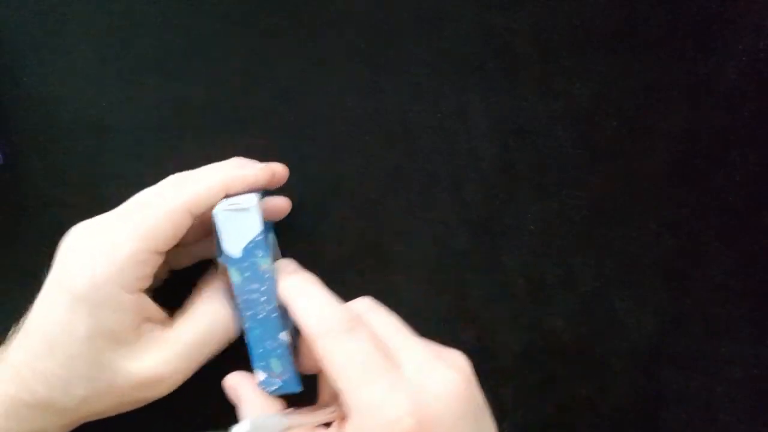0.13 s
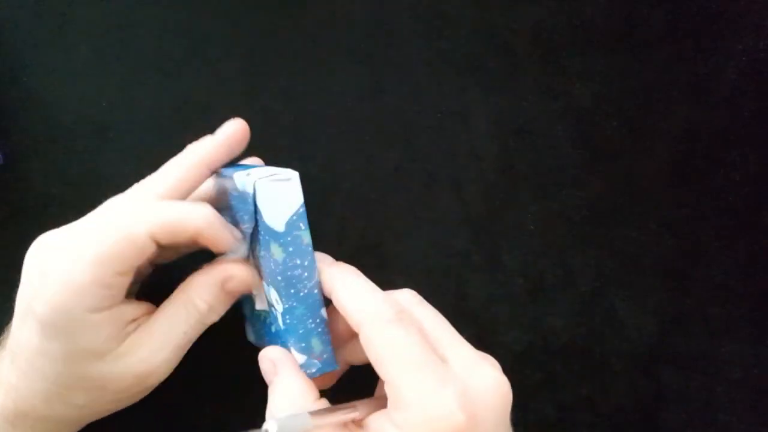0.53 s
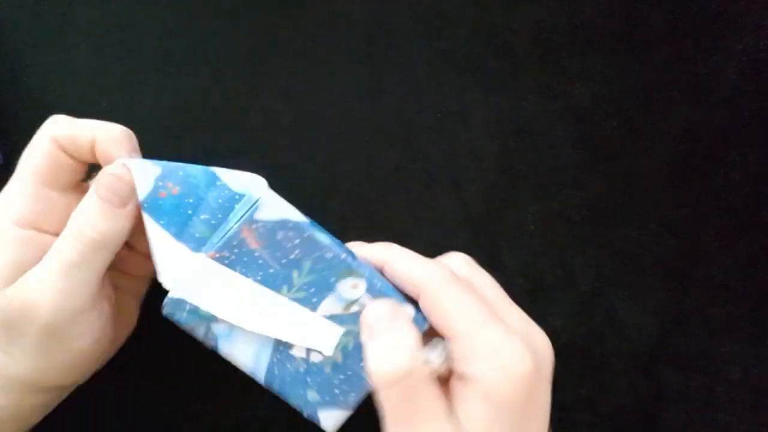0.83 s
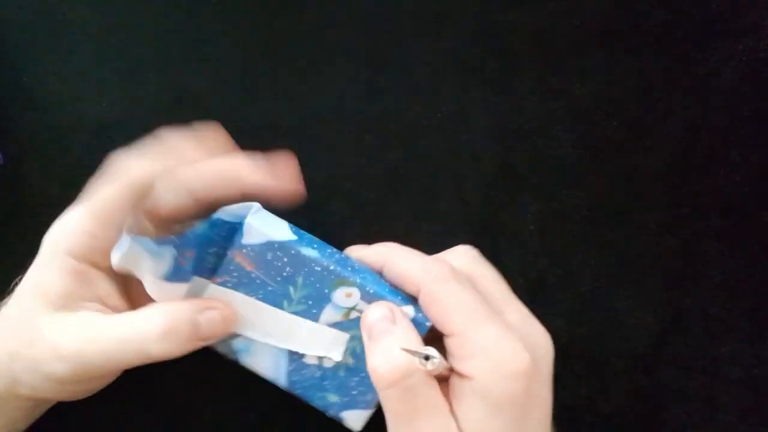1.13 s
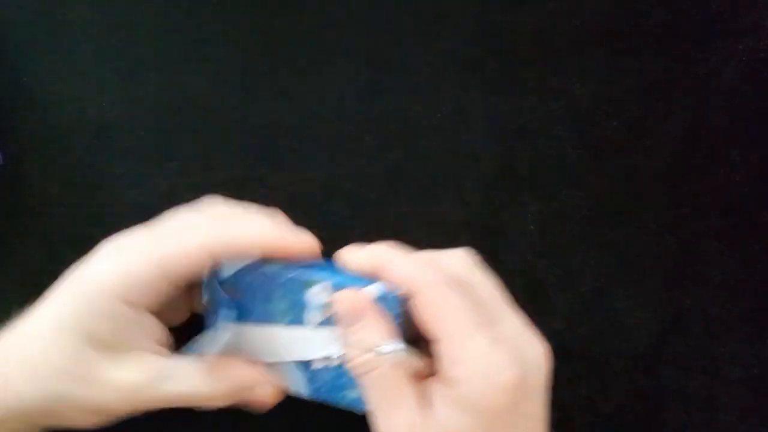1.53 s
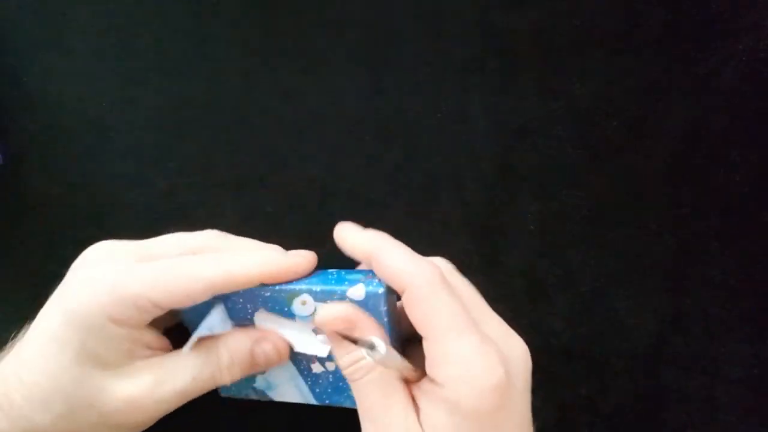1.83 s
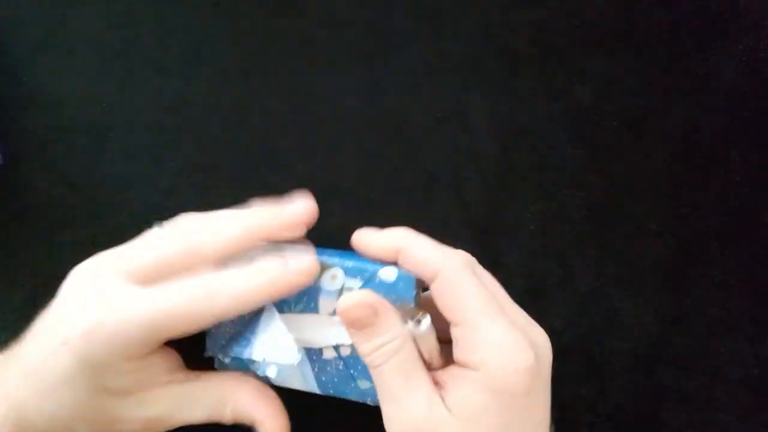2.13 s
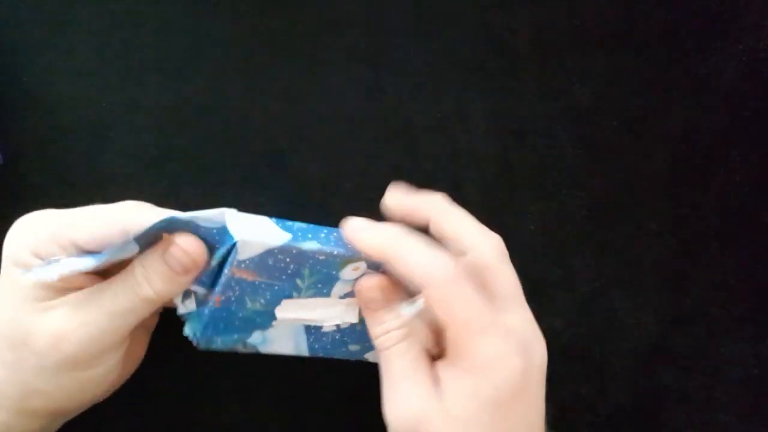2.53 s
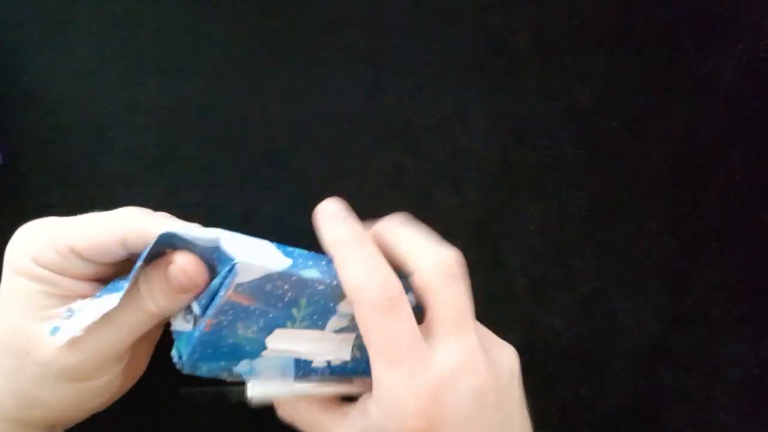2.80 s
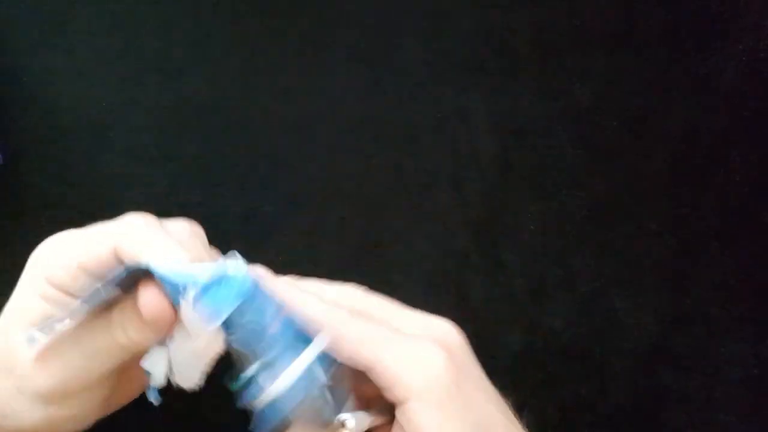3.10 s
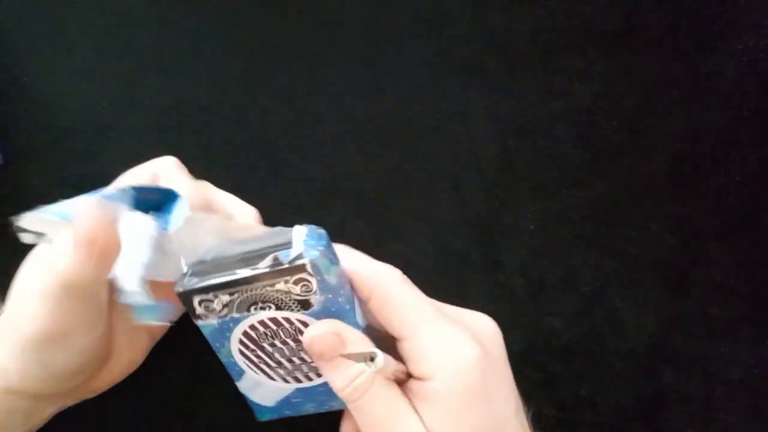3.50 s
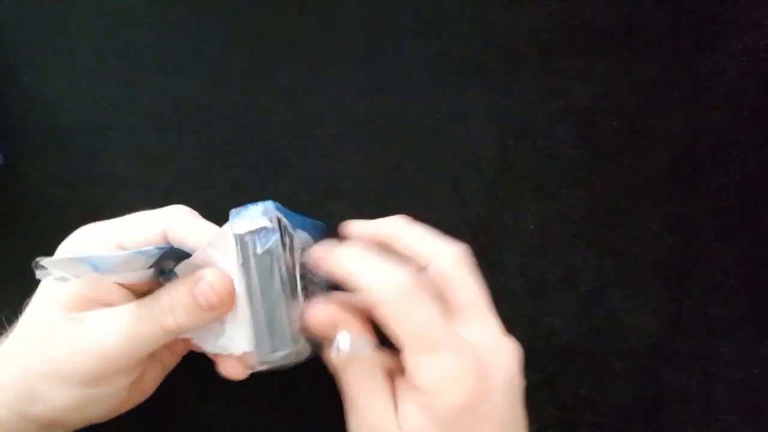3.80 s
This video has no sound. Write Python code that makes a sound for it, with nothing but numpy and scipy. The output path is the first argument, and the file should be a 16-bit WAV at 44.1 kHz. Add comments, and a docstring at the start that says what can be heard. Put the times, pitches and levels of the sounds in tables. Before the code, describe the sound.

Stiff gift paper crinkles and tears off a small cardboard box, close, in a small, fairly dry room. Light crackles at 0.1-0.25 s, near quiet, then a sharp rip at 0.7-0.9 s. Soft rustles follow around 1.4 s, a snap at 1.8, busier crinkling and hollow pops from 2.4. Loudest tearing runs 2.9-3.45 with faint box thumps; after a lull, crisp crumples from 3.7 to the end. Faint hiss throughout.

```python
"""Unwrapping a small box.

Hands pull stiff gift paper off a small cardboard box, close to and a little left of a spaced stereo microphone.
Creases buckle as cracks with short rings; tearing and crumpling are swarms of tiny noise bursts, with a duller rustle.
Hollow pops and low thumps are short decaying sines. A small furnished room answers over faint hiss and rumble."""
import sys
import numpy as np
from scipy import signal
from scipy.fft import rfft, irfft
from scipy.io import wavfile

SR = 44100
rng = np.random.default_rng(int(sys.argv[2]) if len(sys.argv) > 2 else 0)


def waveform_to_disk(signal):
    """Save audio, clipped to [-1, 1], as 16-bit WAV at the path in sys.argv[1]."""
    frames = np.transpose(np.atleast_2d(signal))
    scaled = np.clip(frames, -1, 1) * 32767
    samples = np.round(scaled).astype(np.int16)
    wavfile.write(sys.argv[1], SR, samples)


N = 174195

# colour of the box, for knocks and rustle: (frequency [Hz], density [dB per Hz])
BOX_SPECTRUM = [(35, -49.5), (60, -3.5), (180, -27.5), (249, -14.5), (556, -8), (823, -3.5), (1150, -1.5),
                (1600, -7.5), (2130, -2.5), (3000, -4), (3900, -51.5), (6600, -120)]

PAPER_ALIKE, BOX_ALIKE = 0.5, 0.9   # energy share of a burst common to both microphones
RIGHT_LAG_SAMPLES = 10
BURST_SAMPLES = 512


def amp(db):
    """Amplitude ratio of a level in dB."""
    return 10 ** (np.asarray(db) / 20)


def rms_one(x):
    """Scale to RMS 1."""
    return x / np.sqrt(np.mean(x ** 2) + 1e-20)


def at_hz(points, hz):
    """Table value at a frequency, interpolated over log frequency."""
    table_hz, values = np.transpose(points)
    return np.interp(np.log(hz + 1), np.log(table_hz), values)


def convolve(x, kernel):
    """Convolve along time, cut to the scene length."""
    return signal.fftconvolve(np.atleast_2d(x), np.atleast_2d(kernel), axes=1)[:, :N]


def colour(spectrum, size=4096):
    """Causal (minimum-phase) filter of a dB spectrum, energy 1."""
    hz = np.fft.rfftfreq(size, 1 / SR)
    cepstrum = irfft(np.log(amp(at_hz(spectrum, hz))))
    cepstrum[1:size // 2] *= 2   # fold the cepstrum: minimum phase
    cepstrum[size // 2 + 1:] = 0
    return rms_one(irfft(np.exp(rfft(cepstrum)))) / np.sqrt(size)


def drift(rate_hz):
    """Slow random drift: noise through two equal one-pole lowpasses, RMS 1."""
    pole = np.exp(-2 * np.pi * rate_hz / SR)
    white = rng.standard_normal(N + SR)
    return rms_one(signal.lfilter([1], [1, -2 * pole, pole * pole], white)[SR:])


def stereo_noise(alike_hz, *shape):
    """White noise (.., 2, samples), shared by both sides in the bass only."""
    white = rng.standard_normal(shape)
    low = signal.sosfilt(signal.butter(1, alike_hz, fs=SR, output="sos"), white)
    return white - low + low[..., :1, :]


def bursts(decay_s, alike, count):
    """Dying noise bursts (count, 2, samples), partly shared by the sides, partly whitened, energy 1."""
    t = np.arange(BURST_SAMPLES) / SR
    common = rng.standard_normal((count, 1, BURST_SAMPLES))
    own = rng.standard_normal((count, 2, BURST_SAMPLES))
    noise = np.sqrt(alike) * common + np.sqrt(1 - alike) * own
    spectrum = rfft(noise * np.exp(-t / decay_s))
    out = irfft(spectrum / np.sqrt(np.abs(spectrum))) * np.exp(-0.5 * t / decay_s)
    return out / np.sqrt(np.sum(out ** 2, axis=2, keepdims=True))


def swarm(per_s, spread_db, decay_s, alike, spectrum, low_hz, high_hz):
    """Random clumped bursts of very uneven size, dealt to folds, each with its own ring and busy spells."""
    folds, ring_share, ring_q = 12, 1.1, 3.5
    clump_db, clump_hz = 2.8, 120   # all folds together
    patch_db, patch_hz = 2.4, 20    # each fold alone
    sizes = amp(spread_db * np.minimum(rng.exponential(1, N), 5))
    struck = rng.random(N) < per_s / SR
    clicks = sizes * struck * amp(clump_db * drift(clump_hz))
    fold_of = rng.integers(0, folds, N)
    shapes = bursts(decay_s, alike, count=folds)
    out = np.zeros((2, N))
    for k, hz in enumerate(np.geomspace(low_hz, high_hz, folds)):
        ringing = signal.lfilter(*signal.iirpeak(hz, ring_q, fs=SR), shapes[k])
        shape = shapes[k] + ring_share * ringing / np.sqrt(np.sum(ringing ** 2) / 2)
        fold_clicks = clicks * (fold_of == k) * amp(patch_db * drift(patch_hz))
        out += convolve(fold_clicks, shape)
    return convolve(out, colour(spectrum))


def add(out, time_s, sound):
    """Mix a sound in at a time."""
    i = int(time_s * SR)
    out[:, i:i + sound.shape[1]] += sound


def rings(rows, cycles):
    """Soft pushes: sines with a rounded attack, falling 60 dB in the given cycles."""
    attack_cycles = 0.8
    out, t = np.zeros((2, N + SR)), np.arange(SR // 4) / SR
    for time_s, level_db, hz in rows:
        attack = 1 - np.exp(-t * hz / attack_cycles)
        decay = np.exp(-np.log(1000) * hz * t / cycles)
        add(out, time_s, amp(level_db) * (np.sin(2 * np.pi * hz * t) * attack * decay)[None])
    return out[:, :N]


def noise_floor():
    """Steady hiss and rumble: coloured noise, alike on both sides in the deep bass."""
    # (frequency [Hz], density [dB per Hz])
    floor_spectrum = [(15, -29.5), (25, -11), (76, 5.5), (368, -10), (433, -10.5), (1090, -14), (2460, -21),
                      (6920, -12), (8370, -22), (15200, -11), (16500, -30.5)]
    level_db, alike_hz = -69.5, 60
    return amp(level_db) * convolve(stereo_noise(alike_hz, 2, N), colour(floor_spectrum))


def room(x, count=5):
    """Diffuse echo: octave bands of noise, each dying at its own rate; patterns take turns as the paper moves."""
    # decay by 60 dB: (frequency [Hz], time [s])
    room_t60 = [(150, 0.49), (600, 0.088), (2000, 0.11), (6000, 0.12), (14000, 0.16)]
    # echo colour: (frequency [Hz], level [dB])
    room_colour = [(150, -13.5), (700, -6.5), (2000, 3), (6000, -3), (14000, -2.5)]
    level_db, rise_s, shift_s, alike_hz = -3.5, 0.002, 0.04, 1000   # shift_s: time in one place
    t = np.arange(SR // 2) / SR
    white = stereo_noise(alike_hz, count, 2, len(t))
    tail = np.zeros_like(white)
    for k, hz in enumerate(90 * 2.0 ** np.arange(8)):
        edges_hz = [hz / np.sqrt(2), hz * np.sqrt(2)]
        band = signal.sosfilt(signal.butter(2, edges_hz, "band", fs=SR, output="sos"), white)
        band_db = at_hz(room_colour, hz) - 60 * t / at_hz(room_t60, hz)
        tail += (-1) ** k * band * amp(band_db)
    tails = rms_one(tail * (1 - np.exp(-t / rise_s))) / np.sqrt(len(t))
    place = (np.arange(N) / SR / shift_s).astype(int) % count
    return amp(level_db) * sum(convolve(x * (place == k), tails[k]) for k in range(count))


def thumps():
    """Box against the palm: low damped sines."""
    # (time [s], level [dB], frequency [Hz])
    thump_rows = [(.8365, -18, 317), (1.001, -43.5, 278), (3.152, -35.5, 247), (3.17, -30, 495),
                  (3.38, -35, 250), (3.41, -31, 255)]
    return rings(thump_rows, cycles=9)


def pops():
    """Hollow pops of folds and box walls: damped sines."""
    # (time [s], level [dB], frequency [Hz])
    pop_rows = [(0.876, -19, 1090), (0.905, -38, 1270), (0.997, -34.5, 510), (1.438, -38, 1130),
                (1.465, -33, 1110), (1.511, -30.5, 930), (1.609, -34.5, 1130), (1.953, -17, 1500),
                (2.028, -39, 680), (2.049, -47, 1160), (2.093, -21.5, 1260), (2.135, -33.5, 1070),
                (2.165, -23, 1800), (2.232, -35, 1110), (2.264, -20.5, 1000), (2.284, -33.5, 543),
                (2.292, -23.5, 1000), (2.364, -34, 776), (2.486, -30, 1120), (2.573, -18, 1100),
                (2.602, -47, 1010), (2.755, -17.5, 1540), (2.898, -21, 830), (2.93, -11.5, 840),
                (3.318, -18.5, 840), (3.389, -14, 1140), (3.664, -31.5, 640), (3.697, -21, 560),
                (3.757, -36, 2040), (3.805, -15, 960), (3.889, -29, 870)]
    return rings(pop_rows, cycles=7)


def snaps():
    """Buckling creases: a broad crack with a brief ring at its own pitch, and a knock of the box."""
    # (time [s], level [dB], ring [Hz])
    snap_rows = [(0.0882, -37, 12100), (0.1181, -37, 3850), (0.1291, -25, 5480), (0.1599, -20, 5480),
                 (0.2008, -24, 11100), (0.4574, -57, 5870), (0.5262, -31, 6870), (0.614, -37, 2070),
                 (0.6618, -35, 14000), (0.6862, -22, 13500), (0.7271, -16, 4440), (0.7416, -11, 5210),
                 (0.7449, -12, 4060), (0.7590, -13, 5200), (0.7934, -15, 4110), (0.7985, -12, 4300),
                 (0.8084, -13, 7180), (0.8164, -13, 4060), (0.8359, -9, 4500), (0.9631, -30, 3900),
                 (1.1458, -57, 4370), (1.1737, -55, 6610), (1.4059, -26, 3910), (1.4136, -26, 3020),
                 (1.4688, -36, 4140), (1.5088, -44, 6810), (1.5888, -40, 2070), (1.6476, -40, 3540),
                 (1.7219, -29, 6730), (1.736, -28, 6270), (1.7699, -23, 4680), (1.7817, -22, 2490),
                 (1.7884, -20, 12800), (1.7932, -12, 5820), (1.8381, -19, 5260), (1.9409, -34, 2210),
                 (2.0337, -34, 3370), (2.0841, -35, 2070), (2.093, -26, 4140), (2.2622, -33, 4140),
                 (2.2925, -34, 5000), (2.3988, -29, 7430), (2.4083, -24, 5510), (2.432, -29, 4200),
                 (2.4562, -20, 5000), (2.4851, -23, 5910), (2.5151, -26, 7320), (2.535, -23, 6730),
                 (2.56, -22, 4290), (2.5705, -18, 4350), (2.6029, -21, 3910), (2.6874, -33, 4410),
                 (2.6972, -16, 7150), (2.7396, -25, 6800), (2.782, -27, 6730), (2.8573, -30, 6710),
                 (2.8982, -24, 6380), (2.9167, -20, 2120), (2.9286, -10, 4860), (2.9375, -13, 4000),
                 (2.9464, -12, 5660), (2.9654, -13, 11700), (3.019, -13, 7130), (3.0494, -14, 4020),
                 (3.1127, -14, 6870), (3.1484, -12, 6980), (3.267, -17, 6410), (3.3178, -18, 4640),
                 (3.3881, -10, 6640), (3.455, -19, 4280), (3.6056, -36, 2890), (3.698, -17, 6990),
                 (3.7104, -25, 6320), (3.7563, -16, 2070), (3.771, -18, 6800), (3.8002, -10, 6730),
                 (3.8894, -34, 5770), (3.935, -20, 3870)]
    # (frequency [Hz], density [dB per Hz])
    crack_spectrum = [(410, -37), (700, -14.5), (5020, -15), (7170, -8), (10400, -6.5), (12700, -7),
                      (16500, -3)]
    crack_decay_s, crack_late_s = 0.0012, 0.0006   # crack follows the knock's start
    ring_share, ring_cycles = 1.1, 9
    knock_decay_s, knock_db = 0.0063, -22.5
    out, t = np.zeros((2, N + SR)), np.arange(BURST_SAMPLES) / SR
    cracks = bursts(crack_decay_s, PAPER_ALIKE, count=len(snap_rows))
    knocks = bursts(knock_decay_s, BOX_ALIKE, count=len(snap_rows))
    sharp, box = colour(crack_spectrum)[None, :256], colour(BOX_SPECTRUM)[None, :1024]
    for (time_s, level_db, hz), crack, knock in zip(snap_rows, cracks, knocks):
        ring = np.sin(2 * np.pi * hz * t) * np.exp(-np.log(1000) * hz * t / ring_cycles)
        ring = ring_share * ring / np.sqrt(ring @ ring) + (t == 0)   # direct crack plus ring
        crack = signal.fftconvolve(crack, ring[None], axes=1)
        crack = signal.fftconvolve(crack, sharp, axes=1)
        mono_peak = np.abs(crack[0] + np.roll(crack[1], RIGHT_LAG_SAMPLES)).max() / 2
        knock = signal.fftconvolve(knock, box, axes=1)
        add(out, time_s + crack_late_s, amp(level_db) * crack / mono_peak)
        add(out, time_s, amp(level_db + knock_db) * knock / np.sqrt(np.sum(knock ** 2)))
    return out[:, :N]


def paper():
    """Tearing and crumpling: crackle with its own treble level, and duller rustle, all following the hands."""
    # how hard the paper is worked, one list per grip or pull:
    # (time [s], level [dB], rustle re level [dB], treble re crackle body [dB])
    work = [
        [(0.0, -64.5, 0.5, 0), (0.08, -87, -1, -4), (0.088, -59, -15, -1), (0.112, -54.5, -7, -12),
         (0.13, -36, -8.5, 0), (0.152, -41.5, -8, -6), (0.162, -32.5, -6, 5), (0.192, -41, -10, 2.5),
         (0.212, -38, -9.5, 4), (0.26, -60, -2, 3), (0.352, -62, -3, 3), (0.382, -92, -6, 6),
         (0.5, -75, -18, 4)],
        [(0.51, -81, 2, 0), (0.526, -60.5, -13, 14.5), (0.608, -69.5, -4, 2), (0.612, -48, -9.5, -26),
         (0.68, -75, -7, 10), (0.686, -38, -11, 5.5), (0.742, -27.5, -9.5, 3.5), (0.814, -25.5, -22.5, 9.5),
         (0.846, -34.5, 2, -8), (0.902, -41, 4, 6), (0.952, -64, -11, -9), (0.97, -48, 1, 4),
         (1.048, -89, 2.5, -10), (1.1, -84.5, -14.5, -5)],
        [(1.186, -68, -9, 2), (1.282, -69.5, 3, 5.5), (1.32, -59, -17, 2.5), (1.378, -52, -12, -12),
         (1.394, -47, 2, 5), (1.412, -36.5, -6, -4), (1.436, -42.5, -9, -6), (1.47, -54, 9, -4),
         (1.488, -61, -3.5, 4), (1.576, -58, -2.5, 5), (1.658, -58, -3, -14), (1.7, -89, 7, -4)],
        [(1.71, -69, 3, -2), (1.724, -74, -17, 2), (1.754, -57, -13, -3), (1.798, -37, -11, 13),
         (1.81, -43.5, -5, 1), (1.922, -45.5, -8.5, 1.5), (1.948, -41, -11, -1.5), (1.982, -47, -15, 6.5),
         (2.026, -53, 6, -13), (2.108, -42.5, -14, -1), (2.186, -59, -2, 0), (2.284, -42.5, -5.5, -6.5),
         (2.346, -60.5, -11, 0)],
        [(2.38, -52, -7, 1), (2.404, -43, -5.5, 0.5), (2.532, -38.5, -19.5, 3), (2.57, -29.5, -28, -9),
         (2.598, -55, 8, -1), (2.604, -24.5, -21, -7), (2.632, -47, -4.5, 0), (2.68, -50, -9, -9),
         (2.69, -49.5, -6.5, -11), (2.698, -60.5, -9, 37), (2.716, -37, -7, -3.5), (2.79, -44.5, -8.5, -1),
         (2.84, -48, -0.5, 1), (2.87, -49.5, -7, -1)],
        [(2.88, -52, 9.5, 10), (2.894, -49, 3.5, 0), (2.936, -20, -19, 8), (2.956, -19, -19, -6),
         (3.0, -32.5, -9.5, 5.5), (3.05, -23, -13, -4), (3.096, -31, -9.5, -1), (3.14, -24.5, -10.5, 4),
         (3.205, -28, -19, -2), (3.22, -31, -19, -0.5), (3.288, -43, -1, -8), (3.332, -30.5, -9, 0.5),
         (3.396, -29, -2, 3.5), (3.452, -37.5, -7, 1), (3.554, -64.5, -6.5, -6), (3.6, -54.5, -6, 0)],
        [(3.61, -51.5, -10, -19), (3.648, -72, -2, 12), (3.674, -47, -8, -4), (3.688, -47, 1.5, -4),
         (3.7, -25.5, -12.5, 8.5), (3.72, -57, 12, -7), (3.748, -37, -6.5, 8), (3.756, -31.5, -6.5, 0.5),
         (3.798, -28.5, -20, -3), (3.844, -30, -11.5, -2), (3.896, -47, -3.5, -17), (3.924, -51, -17, 5),
         (3.936, -31, -17, 4), (3.95, -29.5, -23, 0)],
    ]
    # (frequency [Hz], density [dB per Hz])
    paper_spectrum = [(410, -25.5), (700, -26), (1130, 7.5), (1370, -48), (1570, 1.5), (2150, -4),
                      (2460, -1.5), (4060, 1.5), (6990, 3.5), (8410, -8.5), (13200, 2.5), (15900, -3),
                      (16500, -0.5)]
    crackle_db, rustle_db, split_hz = -4.5, -1.5, 8200
    time_s, *columns = np.transpose(np.vstack(work))
    work_db, dull_db, treble_db = (np.interp(np.arange(N) / SR, time_s, c) for c in columns)
    crackle = swarm(per_s=2500, spread_db=3.3, decay_s=0.0007, alike=PAPER_ALIKE,
                    spectrum=paper_spectrum, low_hz=1863, high_hz=12100)
    body = rms_one(signal.sosfilt(signal.butter(4, split_hz, "low", fs=SR, output="sos"), crackle))
    treble = rms_one(signal.sosfilt(signal.butter(4, split_hz, "high", fs=SR, output="sos"), crackle))
    rustle = rms_one(swarm(per_s=1200, spread_db=3.0, decay_s=0.0017, alike=BOX_ALIKE,
                           spectrum=BOX_SPECTRUM, low_hz=303, high_hz=2465))
    crackle = amp(crackle_db) * (body + amp(treble_db) * treble)
    return amp(work_db) * (crackle + amp(rustle_db + dull_db) * rustle)


def scene():
    """Direct sound, later on the right, plus room and floor."""
    near = paper() + snaps() + thumps() + pops()
    late_right = np.r_[np.zeros(RIGHT_LAG_SAMPLES), near[1, :-RIGHT_LAG_SAMPLES]]
    direct = np.array([near[0], late_right])
    echo = room(near)
    return direct + echo + noise_floor()


def record(dry):
    """The left microphone is a little more sensitive; the top is cut."""
    left_louder_db, cutoff_hz = 1.4, 16400
    ports = dry * amp(left_louder_db * np.array([[0.5], [-0.5]]))
    return signal.sosfilt(signal.cheby2(20, 90, cutoff_hz, fs=SR, output="sos"), ports)


dry = scene()
out = record(dry)
waveform_to_disk(out)
```